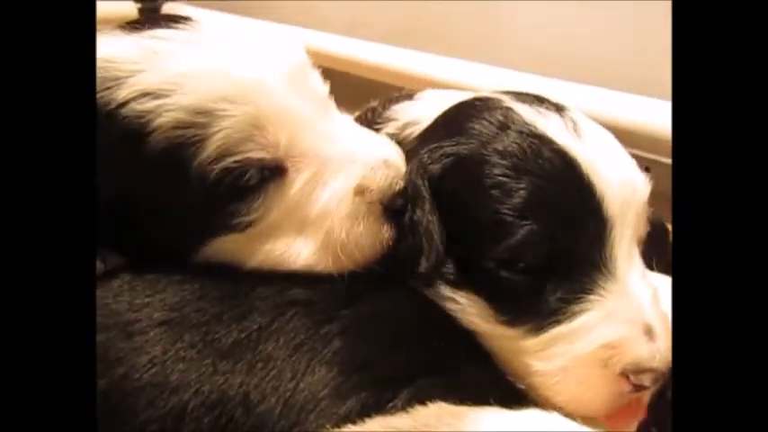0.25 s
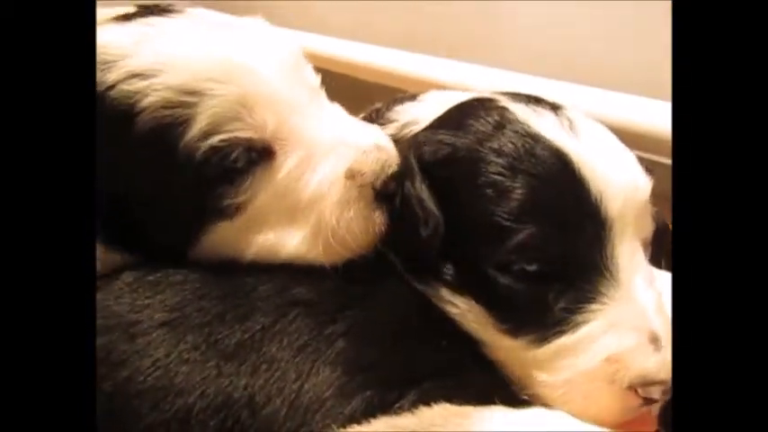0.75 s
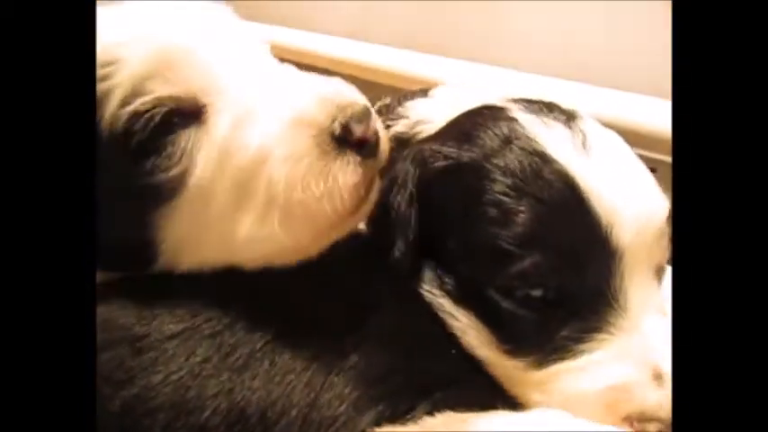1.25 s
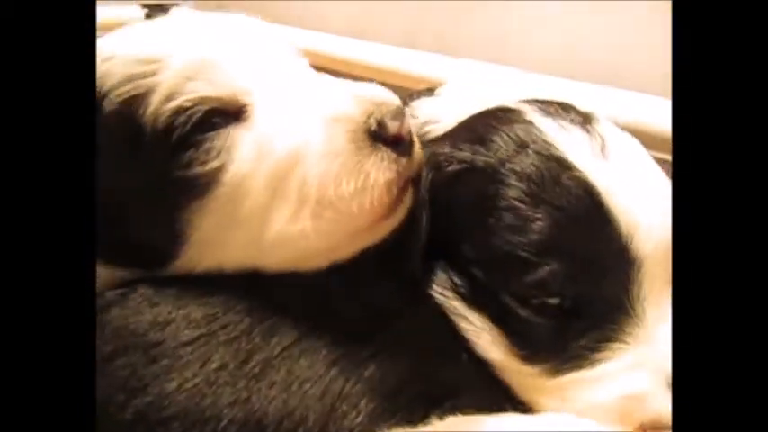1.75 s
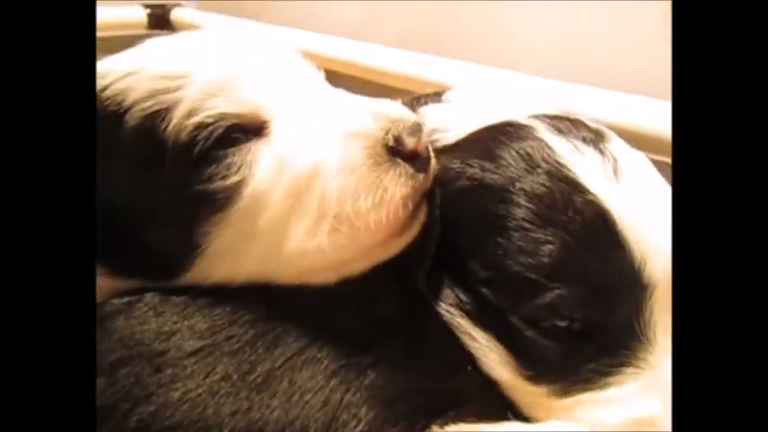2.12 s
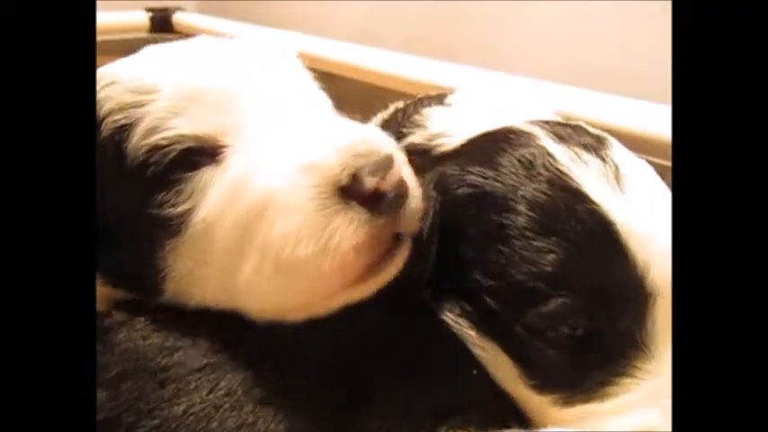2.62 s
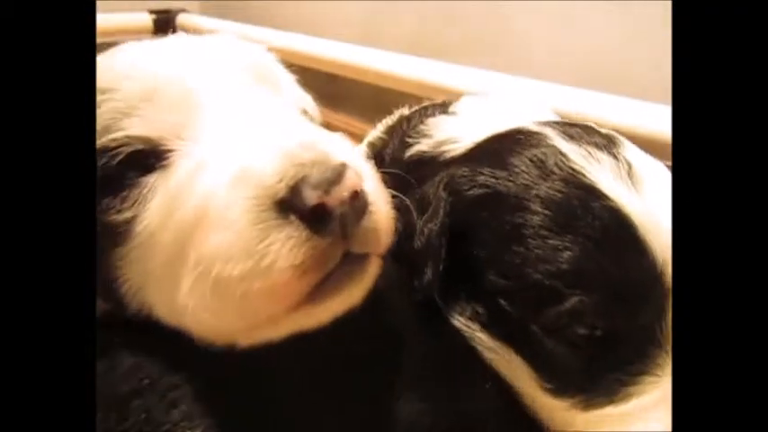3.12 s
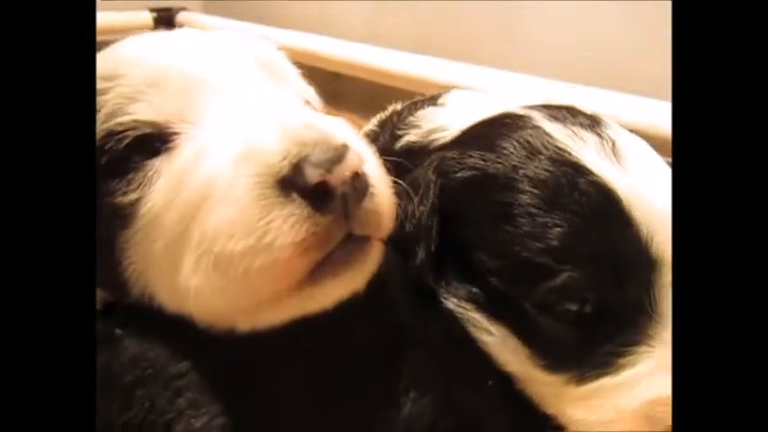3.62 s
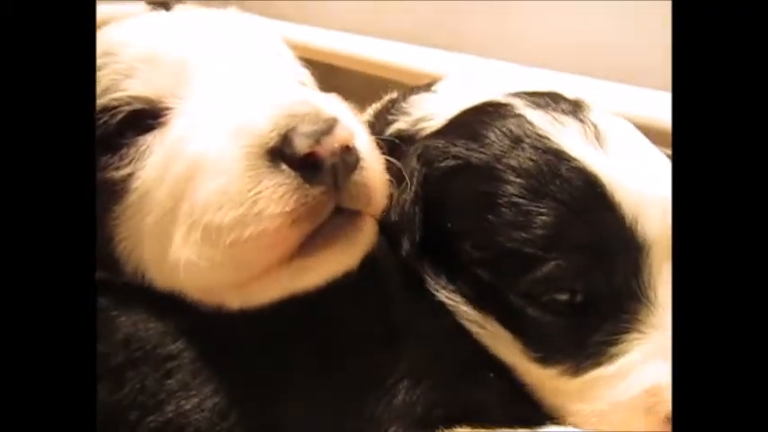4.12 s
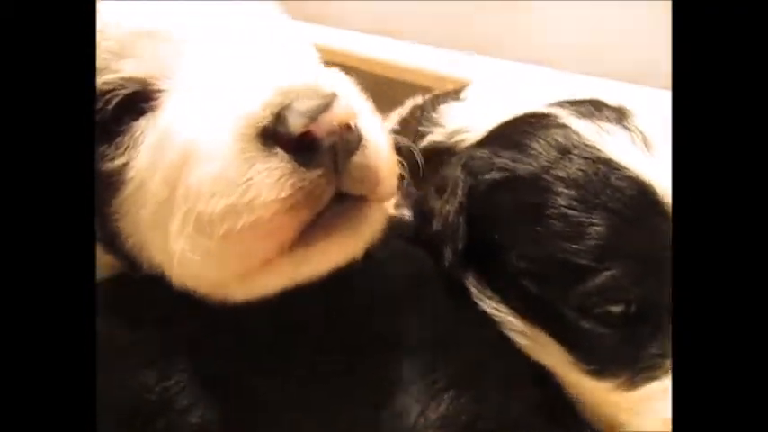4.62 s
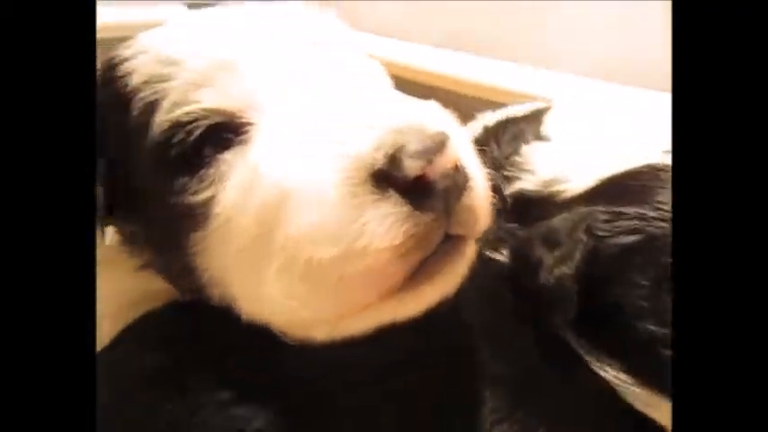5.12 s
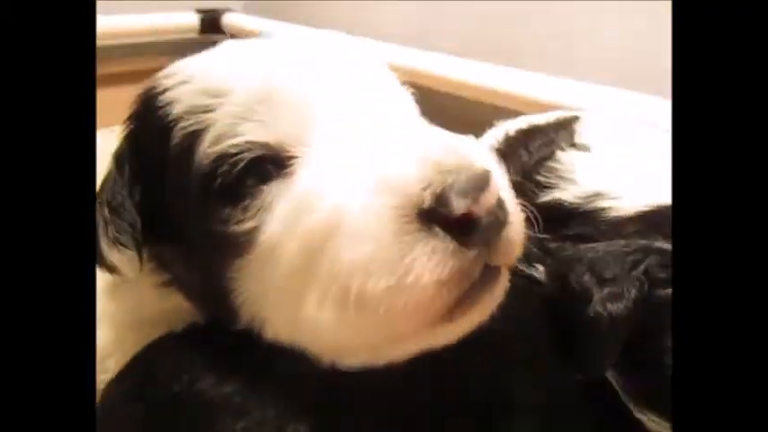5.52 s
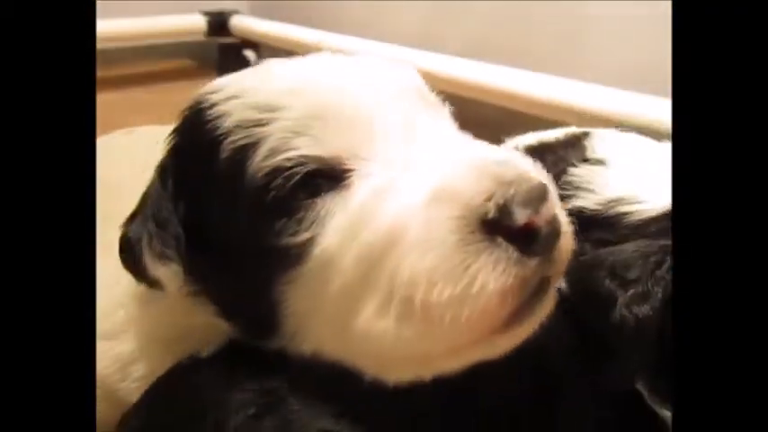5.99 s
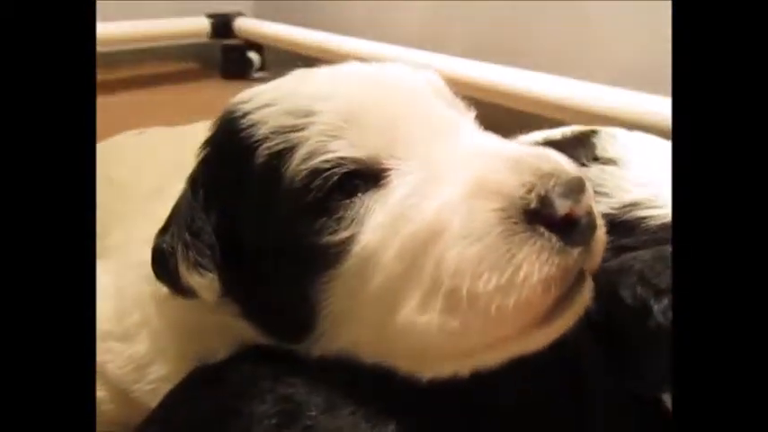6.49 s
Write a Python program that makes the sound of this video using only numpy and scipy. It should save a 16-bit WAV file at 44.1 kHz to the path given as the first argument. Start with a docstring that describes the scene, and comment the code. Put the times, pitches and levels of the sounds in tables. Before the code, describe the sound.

Newborn puppies very close by: wet mouth clicks throughout, brief squeaks, soft grunts, one falling whine, low whimpers, dull pen bumps, over steady hiss.

```python
"""Newborn puppies lie piled up just right of a small two-port camera microphone in a quiet room.
Hiss of room and preamp runs throughout; wet mouths click from the start, and a soft sniff comes early.
Then come a closed-mouth grunt, short squeaks, a long falling whine, and bumps of paws and heads on the pen.
More grunts and two low whines follow, with sniffs close by near the end and one last bump.
Folds ring throats, noses leak noise, clicks ring mouths, blows ring the pen; the room adds a dull tail."""
import sys
import numpy as np
from scipy import signal
from scipy.fft import rfft, irfft
from scipy.io import wavfile
from scipy.ndimage import uniform_filter1d

SR = 44100
rng = np.random.default_rng(int(sys.argv[2]) if len(sys.argv) > 2 else 0)


def inscribe(sig):
    """Save sig as 16-bit PCM at rate SR to the path in sys.argv[1].

    A 1-D sig is mono; a 2-D sig holds one channel per row.
    Samples are clipped to [-1, 1] before scaling.
    """
    pcm = np.round(np.clip(np.atleast_2d(sig).T, -1, 1) * 32767)
    wavfile.write(sys.argv[1], SR, pcm.astype(np.int16))


N = 297675

# Resonances of the throat: centre_hz, width_hz (6 dB down), level_db
THROAT = [(274, 160, 4), (535, 260, 1), (830, 490, 6), (1490, 350, 4), (1770, 500, -4.5)]
PORT_LAG = 4  # samples by which sound from the right reaches the left port later
AIR_PAN_DB = -6.5  # left minus right, for air from the noses
RELEASE_S, RELEASE_DB = 0.01795, -13  # the dying end of a call or whine
CLOSE_DB = -13  # the overtone slope steepens by this much per octave as a call dies


def undb(db):
    """Decibels to amplitude factor."""
    return 10 ** (np.asarray(db) / 20)


def unit(x):
    """Scales each channel to rms 1."""
    return x / np.sqrt(np.mean(x ** 2, axis=-1, keepdims=True))


def resonate(x, hz, width_hz):
    """Two equal resonances in a row, with gain 1 at the centre; each has the given width."""
    centre_hz = min(hz, .4 * SR)
    b, a = signal.iirpeak(centre_hz, hz / width_hz, SR)
    return signal.lfilter(b, a, signal.lfilter(b, a, x))


def resonant_noise(noise, resonances):
    """Noise of rms 1 through parallel resonances of centre, width and level."""
    return unit(sum(undb(db) * resonate(noise, hz, width_hz) for hz, width_hz, db in resonances))


def coloured(shape, spectrum):
    """Noise of rms 1 with the given (Hz, dB) colour."""
    hz, db = np.transpose(spectrum)
    f = np.maximum(np.arange(N // 2 + 1) * SR / N, 1)
    gain = undb(np.interp(np.log(f), np.log(hz), db))
    return unit(irfft(rfft(rng.standard_normal(shape)) * gain, N))


def walk(rate):
    """Smooth random wander of spread 1, changing about rate times a second."""
    size = int(SR / rate)
    smooth = uniform_filter1d(rng.standard_normal(N), size)
    return unit(uniform_filter1d(smooth, size))


def wandering_sine(hz, spread, rate):
    """A sine whose pitch wanders around hz by a relative spread."""
    return np.sin(2 * np.pi * np.cumsum(hz * (1 + spread * walk(rate))) / SR)


def track(tables, column, silent=None):
    """Joins one column of several tables in time; across a pause it falls to the silent value."""
    rows = []
    far_end = [[N]]  # a start long after the last sound
    for table, after in zip(tables, [*tables[1:], far_end]):
        rows += [(row[0], row[column]) for row in table]
        last_s, next_s = table[-1][0], after[0][0]
        if silent is not None and next_s - last_s > .015:
            rows += [(last_s + .012, silent), (next_s - .004, silent)]
    if silent is not None:
        rows.insert(0, (rows[0][0] - .012, silent))
    return np.interp(np.arange(N) / SR, *np.transpose(rows))


def place(x, pan_db, lag=PORT_LAG):
    """A source on two ports: pan_db is left minus right, and the left hears it lag samples later."""
    return np.array([np.roll(x, lag) * undb(pan_db / 2), x * undb(-pan_db / 2)])


def hiss():
    """Steady noise of room and preamp, unrelated left and right, swelling a little."""
    # Colour of the hiss: frequency_hz, density_db (relative)
    hiss_colour = [(12, -69), (20, 2), (108, 1), (179, 0), (258, 4), (652, -2.5), (709, -2), (1430, -6.5),
                   (1790, -10), (3830, -15), (7100, -13), (15500, -21.5), (16200, -54)]
    level_db, pan_db = -55.5, -0.8  # pan is left minus right
    sides_db = np.array([[pan_db], [-pan_db]]) / 2
    swell_db = .6 * walk(1)
    return coloured((2, N), hiss_colour) * undb(level_db + sides_db + swell_db)


def room(dry):
    """Bodies, bedding and pen walls return a short dull tail, different at each port."""
    t60_s, dull_above_hz, level_db = 0.12, 2820, -17
    t = np.arange(int(.25 * SR)) / SR
    decay = np.exp(-np.log(1000) * t / t60_s)
    tail = rng.standard_normal((2, len(t))) * decay * (t > .002)
    tail = signal.lfilter(*signal.butter(1, dull_above_hz, fs=SR), tail)
    tail = tail / np.sqrt(np.sum(tail ** 2, axis=1, keepdims=True))
    return undb(level_db) * signal.fftconvolve(dry, tail, axes=1)[:, :N]


def knocks():
    """Paws and heads ring the two modes of the pen with dull blows, nearly ahead of the microphone."""
    # Blows: start_s, level_db (lower mode), hardness_db (upper mode over lower)
    blows = [(3.521, -40.5, 4), (3.534, -46, 1), (3.721, -38.5, 16), (3.726, -68, -17), (4.24, -46.5, 17),
             (4.301, -44, 4.5), (4.312, -40.5, -20), (4.356, -43.5, 5.5), (6.592, -58, 22)]
    # Modes of the pen: pitch_hz, t60_s
    pen_modes = [(690, 0.024), (1500, 0.0037)]
    out, t = np.zeros(N), np.arange(2000) / SR
    low, high = (np.sin(2 * np.pi * hz * t) * np.exp(-np.log(1000) * t / t60) for hz, t60 in pen_modes)
    for s, db, hard_db in blows:
        at = int(s * SR)
        out[at:at + len(t)] += undb(db) * (low + undb(hard_db) * high)
    return place(out, pan_db=0.0, lag=1)


def sniffs():
    """Air drawn through a close nose and wet fur rubbing: fluttering noise, half alike at the ports."""
    # Loudness of each sniff: time_s, level_db
    breaths = [
        [(0.285, -62), (0.345, -58)],
        [(5.945, -53), (6.007, -42.5), (6.05, -48.5)],
        [(6.055, -43.5), (6.14, -53)],
    ]
    # Colour of the air: frequency_hz, density_db (relative)
    sniff_colour = [(350, -53), (600, -23), (781, 8), (3590, 12), (6700, 18.5), (12200, 9.5), (15800, 6),
                    (16500, -31)]
    apart_db = -0.5  # the part that differs at the two ports
    flutter_db = 1.5 * walk(90)
    gain = undb(track(breaths, column=1, silent=-100) + flutter_db)
    near, left, right = coloured((3, N), sniff_colour) * gain
    return place(near, AIR_PAN_DB) + undb(apart_db) * np.array([left, right])


def clicks():
    """A wet seal snaps open: a sharp push, a fizz of a few milliseconds, then stray bubbles burst."""
    # Lip and tongue clicks: start_s, level_db (about the peak, left port),
    # smack_db and snap_db (hollow smack and top snap over that level)
    clear = [(0.0204, -27.5, -12.5, -8.5), (0.0842, -35, -9, -18), (0.1316, -21, -9.5, -7),
             (0.1696, -37.5, 4.5, -16), (0.183, -32, -28, -6), (0.291, -27, -42, -14),
             (0.295, -28.5, -8.5, -23), (0.3127, -27, -39, -22), (0.3229, -27.5, -36, -4.5),
             (0.366, -40, -22, 0), (0.4989, -29.5, -9.5, -14), (0.5684, -21.5, -21, -15),
             (0.638, -29.5, -0.5, -6), (0.6703, -34, -23, -18), (0.6866, -33, -31, -2),
             (0.7067, -32, -6, -25), (0.742, -33, -30, -1.5), (1.0333, -29, -15, -4.5),
             (1.0594, -24, -3.5, -8), (1.083, -28.5, -31, -2), (1.131, -35, -28, -1),
             (1.2718, -23, -19, -13), (1.499, -26, -6, -13), (1.556, -38, -29, 6), (1.5859, -36, -14, -1.5),
             (1.6282, -35.5, -12, -8), (1.866, -37.5, -4, -17), (1.9106, -32, -33, -14),
             (1.965, -35.5, -25, -1), (2.0071, -37, -33, -1.5), (2.251, -32.5, -13, -8),
             (2.258, -36, -30, -14), (2.2917, -30, -0.5, -19), (2.3108, -31, -9, -2), (2.3476, -36, -15, 3),
             (2.5988, -35, -16, -12), (2.6394, -22.5, -9, -2), (2.6435, -30, -12, -8),
             (2.6896, -28, -16, -3.5), (2.7101, -34, -26, -2), (3.0702, -33.5, -8, 2.5),
             (3.3574, -42, -9, -15), (3.3884, -29, -16, -1.5), (3.393, -27, -20, -5),
             (3.3998, -22.5, -25, -33.5), (3.407, -22, -17, -1.5), (3.4243, -29, -13, -22),
             (3.4454, -25.5, -14.5, -3), (3.485, -42, -5, -9), (3.7243, -41, 0.5, -5),
             (3.751, -28, -24, -5), (3.7714, -32, -12, -4.5), (3.799, -35, -29, -1),
             (3.813, -25.5, -16, -1), (4.1268, -27.5, -3.5, -11), (4.1725, -25, -34, -0.5),
             (4.192, -28, -26, -2.5), (4.314, -37.5, -2, -19), (4.5168, -25.5, -8, -19),
             (4.5678, -28.5, -31, -1), (4.5853, -29, -37, 0), (4.9442, -31, -6.5, -15),
             (5.0, -32, -33, -1.5), (5.0759, -33, -30, -14), (5.2212, -26.5, -7.5, -9),
             (5.3988, -42, -2, -14), (5.4615, -28, -10.5, -22), (6.1647, -32.5, -12, -14)]
    # Smack, body and snap of a click: centre_hz, width_hz (each of two passes)
    mouth = [(1900, 1930), (5500, 5700), (12500, 3800)]
    spread_s, faintest_db, pan_db = .09, -38.5, -7  # pan is left minus right
    out, t = np.zeros((2, N + 2000)), np.arange(1500) / SR
    # faint ticks of wet mouths and fur fall at random around the clear ones
    near, late, loud, smack, snap = rng.random((34, 5)).T
    neighbour_s = np.array(clear)[(near * len(clear)).astype(int), 0]
    when = np.abs(neighbour_s + spread_s * (2 * late - 1))
    faint = zip(when, faintest_db + 8 * loud, 22 * smack - 30, 12 * snap - 14)
    for s, db, smack_db, snap_db in [*clear, *faint]:
        # partly shared and partly separate at the two ports
        fizz = rng.standard_normal(len(t)) + 0.92 * rng.standard_normal((2, len(t)))
        burst = fizz * (0.1 * np.exp(-t / 0.00099) + 0.021 * np.exp(-t / 0.011))
        popping = rng.random(len(t)) < .004
        burst += 0.8 * rng.standard_normal(len(t)) * popping * np.exp(-t / 0.0067)
        burst[:, 0] += 1  # the sharp push
        # what the snap leaves of the peak goes to the body
        body = np.sqrt(max(1 - undb(2 * snap_db), .05))
        sizes = undb(smack_db), body, undb(snap_db)
        rings = [resonate(burst, hz, width_hz) for hz, width_hz in mouth]
        click = sum(size * ring / np.abs(ring).max() for size, ring in zip(sizes, rings)) * undb(db)
        for port in range(2):
            at = int(s * SR) + PORT_LAG * (1 - port)
            out[port, at:at + len(t)] += click[port] * undb(-pan_db * port)
    return out[:, :N]


def calls():
    """Every utterance as (s, pitch Hz, level dB, slope, roughness) points, in order of time."""
    # How irregularly the folds beat in each kind of voice: roughness (0-1)
    voices = {"pure": 0, "clear": .18, "husky": .27, "hoarse": .5, "raspy": .7}
    # Short closed-mouth grunts on one note: peak_s, level_db, slope_db (per octave of overtones)
    grunts = [(0.776, -36.5, -14.5), (3.81, -39, -10), (3.852, -38.5, -16), (4.146, -36, -25),
              (5.415, -52.5, -7)]
    # Single calls: start_s, length_s, first_hz, middle_hz, last_hz, level_db, swell_db,
    # slope_db (per octave of overtones), voice
    single_calls = [(1.43, .064, 1518, 1683, 1684, -29.5, 2.5, -18, "pure"),
                    (1.875, 0.044, 930, 931, 926, -35, -4, -12, "raspy"),
                    (1.914, 0.039, 874, 898, 810, -36, -20, -19, "raspy"),
                    (2.304, 0.086, 972, 940, 956, -35.5, 1.5, -16, "raspy"),
                    (2.381, 0.034, 898, 778, 592, -43, -30, -4.5, "raspy"),
                    (4.441, 0.079, 330, 345, 368.3, -34.5, 2.5, -5, "husky"),
                    (4.795, .084, 258.1, 274.6, 259.4, -36.5, 1, -4.5, "husky"),
                    (5.636, .09, 273.6, 299.2, 266.5, -35, 0, -6.5, "husky")]
    # Long whines, the second with a break of the voice: time_s, pitch_hz, level_db,
    # slope_db (per octave of overtones), voice
    whines = [
        [(2.729, 1116, -37, -13, "raspy"), (2.755, 1011, -33.5, -4, "raspy"), (2.76, 1003, -36, -4, "husky"),
         (2.783, 877, -27.5, -11, "husky"), (2.797, 790, -33, -4, "hoarse"), (2.812, 524, -40.5, 4, "raspy"),
         (2.817, 433.7, -30.5, -2, "raspy"), (2.85, 338.7, -32, -9, "husky"),
         (2.875, 275, -33.5, -8.5, "husky"), (2.92, 243.7, -41.5, -2, "hoarse"),
         (2.96, 251.8, -38.5, -6.5, "hoarse"), (2.985, 231, -40.5, -2.5, "hoarse"),
         (3.015, 261.5, -37, -4, "husky"), (3.09, 269.7, -35.5, -0.5, "clear"),
         (3.145, 273.4, -34.5, -4, "clear"), (3.178, 250.8, -39.5, -3, "husky"),
         (3.21, 274.4, -40, -6.5, "hoarse"), (3.235, 251.7, -41, -2, "hoarse")],
        [(5.031, 322, -39, -5, "husky"), (5.055, 306, -32.5, -6, "husky"), (5.085, 271.8, -36, -6, "clear"),
         (5.115, 259.5, -36, -7.5, "clear"), (5.152, 263.7, -36, -5, "clear"), (5.158, 317.6, -34, -4, "raspy"),
         (5.17, 326.5, -31.5, -7, "husky"), (5.2, 325, -32.5, -2.5, "clear"),
         (5.235, 347.4, -33.5, -3, "clear"), (5.262, 381.8, -34, -1.5, "husky"),
         (5.285, 344.6, -35, -6, "husky")],
        [(6.06, 287.8, -35.5, -12.5, "husky"), (6.095, 293.8, -33.5, -5, "husky"),
         (6.125, 275, -37, -11, "husky"), (6.17, 303, -34, -6.5, "husky"), (6.195, 275.2, -35.5, -6, "husky"),
         (6.225, 281.7, -37, -10.5, "husky"), (6.26, 288.2, -34.5, -6, "clear"),
         (6.285, 276, -34.5, -8, "clear"), (6.305, 255, -42, -7.5, "clear"),
         (6.35, 268.3, -36.5, -5.5, "clear"), (6.385, 249.8, -42, -8.5, "clear"),
         (6.45, 243.4, -40.5, -5.5, "clear")],
    ]
    grunt_hz, grunt_rise_s, grunt_fall_s, grunt_edge_db = 294, 0.0124, .02, -24.5
    attack_s, attack_db = .01, -7
    arch_db = 3.25  # a call is this much louder in the middle
    out = []
    for s, db, slope in grunts:
        edge = db + grunt_edge_db
        points = (s - grunt_rise_s, edge), (s, db), (s + grunt_fall_s, edge)
        out.append([(t, grunt_hz, level, slope, voices["hoarse"]) for t, level in points])
    for s, length, first, middle, last, db, swell, slope, voice in single_calls:
        t = s + np.array([0, attack_s, length / 2, length - RELEASE_S, length])
        # the pitch bends along a parabola through its three values
        bend = np.polyfit([s, s + length / 2, s + length], [first, middle, last], deg=2)
        hz = np.polyval(bend, t)
        shape_db = np.array([attack_db, 0, arch_db, 0, RELEASE_DB])
        level = db + swell * ((t - s) / length - .5) + shape_db
        slopes = slope + CLOSE_DB * (t == t[-1])
        out.append([(*point, voices[voice]) for point in zip(t, hz, level, slopes)])
    for whine in whines:
        s, hz, db, slope, voice = whine[-1]
        points = [*whine, (s + RELEASE_S, hz, db + RELEASE_DB, slope + CLOSE_DB, voice)]
        out.append([(*point[:-1], voices[point[-1]]) for point in points])
    return sorted(out)


def ring_throat(hz, phase, slope_db):
    """Ten harmonics of the vocal folds, each taking the gain of the throat at its frequency."""
    tone, power = 0, 0
    for k in range(1, 11):
        throat = sum(undb(db) / (1 + (2 * (k * hz - f) / w) ** 2) for f, w, db in THROAT) + undb(-47.0)
        size = throat * undb(slope_db * np.log2(k))
        # the upper harmonics lag, and come and go
        flicker_db = 3 * min(k - 1, 1) * walk(55)
        tone = tone + size * undb(flicker_db) * np.sin(k * phase - k ** 2 / 2)
        power = power + size ** 2 / 2
    return tone / np.sqrt(power)


def roughen(tone, hz, rough):
    """Slack tissue under a high rough squeak flaps, adding a note and sidebands, and throbs."""
    slack = rough * np.clip((hz - 430) / 150, 0, 1)
    flap = slack * wandering_sine(310, spread=.1, rate=60)
    throb = slack * wandering_sine(80.06, spread=.25, rate=40)
    flapping = tone * (1 + 0.47 * flap) + 0.35 * flap
    return -flapping * (1 + .85 * throb)


def whimpers():
    """Vocal folds ring the throat; rough folds waver, throb and leak air; the nose hisses once a cycle."""
    # Resonances of the nose: centre_hz, width_hz (each of two passes), level_db
    nose = [(5910, 1100, -4.5), (8780, 1370, -7.5), (12300, 3600, -22.5), (2800, 1400, -14.5)]
    said = calls()
    hz, slope_db, rough = (track(said, column) for column in (1, 3, 4))
    loudness = [[(s, undb(db)) for s, _, db, *_ in call] for call in said]
    gain = np.maximum(track(loudness, column=1, silent=0), 0)
    jitter = (.002 + .03 * rough) * walk(260) + .009 * (hz < 500) * walk(45)
    phase = 2 * np.pi * np.cumsum(hz * (1 + jitter)) / SR
    tone = roughen(ring_throat(hz, phase, slope_db), hz, rough)

    leak = resonant_noise(rng.standard_normal(N), THROAT[1:])
    share = .04 * rough + .3 * rough ** 2  # power that goes to leaking air
    waver_db = 2 * rough ** 2 * walk(130)
    voice = (np.sqrt(1 - share) * tone + np.sqrt(share) * leak) * undb(waver_db)

    # bright, pressed calls push more air through the nose
    air_db = -14.5 + .41 * slope_db + 1.5 * walk(25)
    air = resonant_noise(rng.standard_normal(N), nose)
    air = air * (1 + .5 * np.cos(phase)) * undb(air_db)
    # the low voice bends round bodies and reaches the left port later still
    return place(gain * voice, pan_db=-8, lag=6) + place(gain * air, AIR_PAN_DB)


def scene():
    """The litter close by, its tail in the room, and the hiss."""
    litter = whimpers() + clicks() + sniffs() + knocks()
    return litter + room(litter) + hiss()


def record(dry):
    """The camera notches one narrow band and cuts the top."""
    notch_hz, notch_width_hz, top_hz = 7800, 60, 16500
    notched = signal.lfilter(*signal.iirnotch(notch_hz, notch_hz / notch_width_hz, SR), dry)
    return signal.sosfilt(signal.ellip(10, .2, 70, top_hz, fs=SR, output="sos"), notched)


dry = scene()
out = record(dry)
inscribe(out)
```